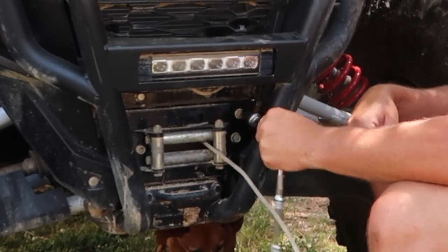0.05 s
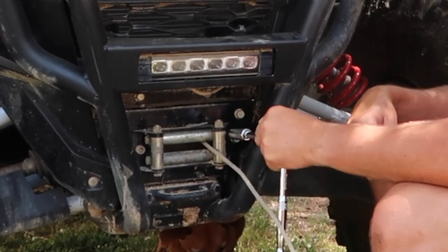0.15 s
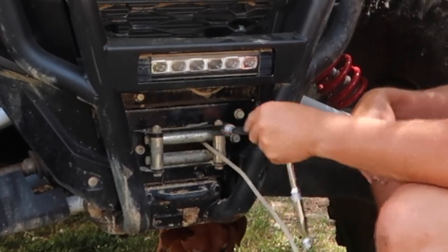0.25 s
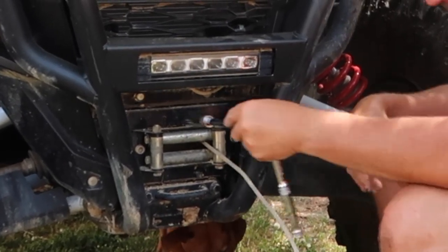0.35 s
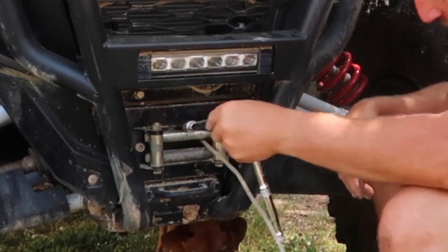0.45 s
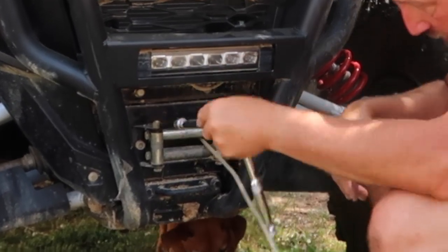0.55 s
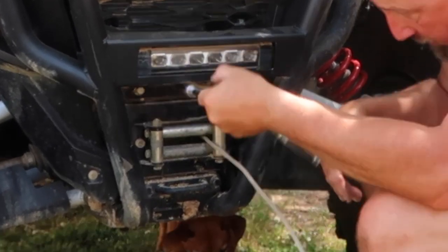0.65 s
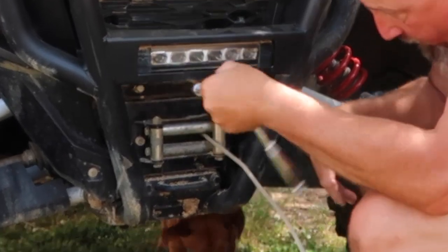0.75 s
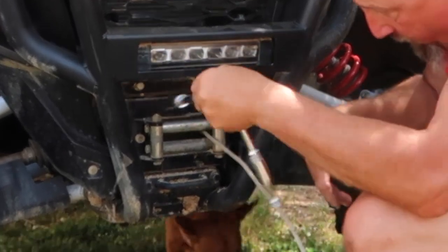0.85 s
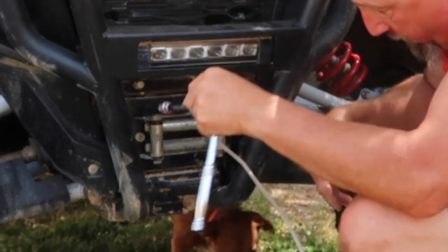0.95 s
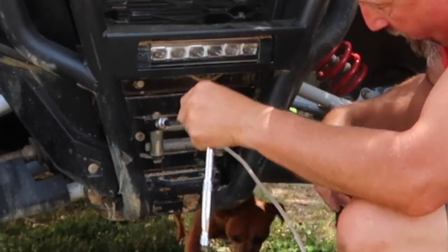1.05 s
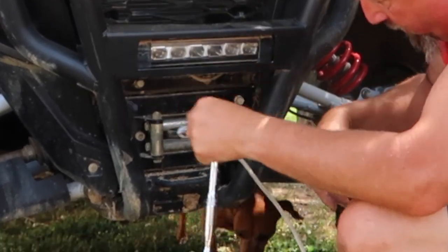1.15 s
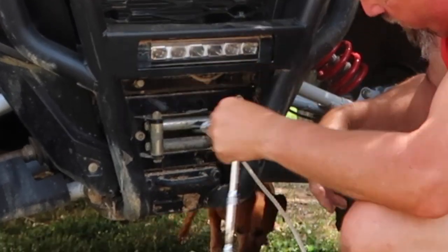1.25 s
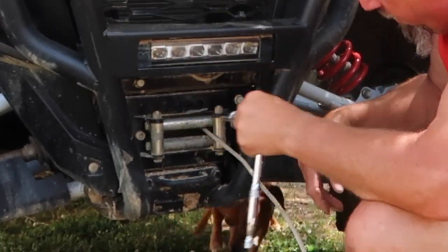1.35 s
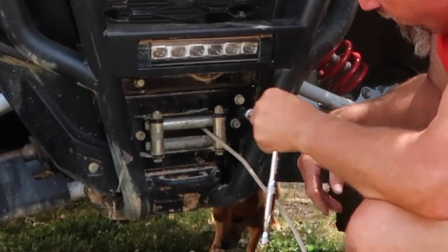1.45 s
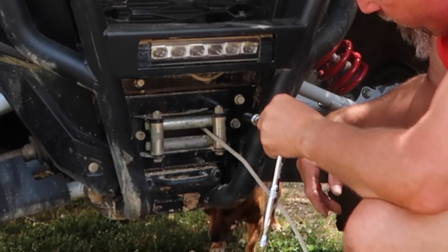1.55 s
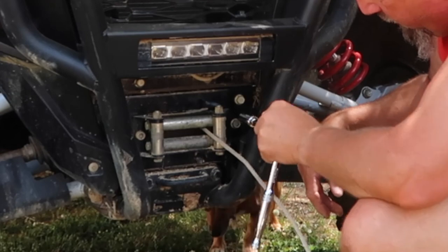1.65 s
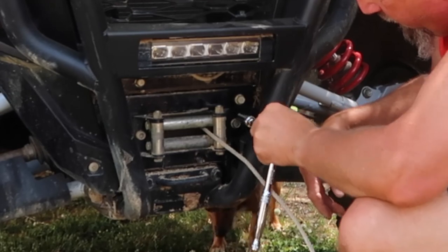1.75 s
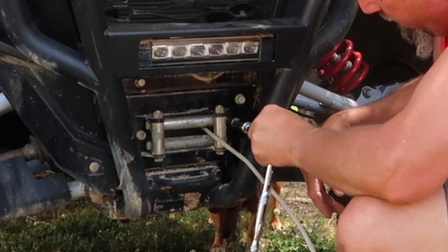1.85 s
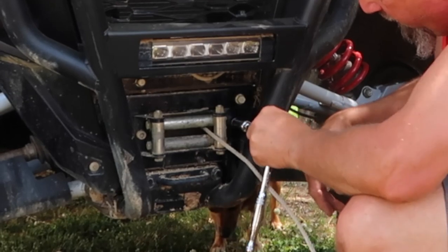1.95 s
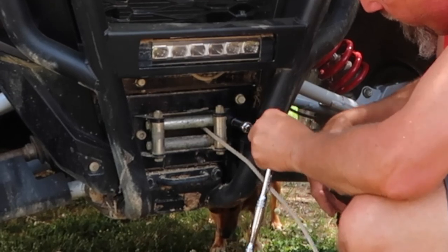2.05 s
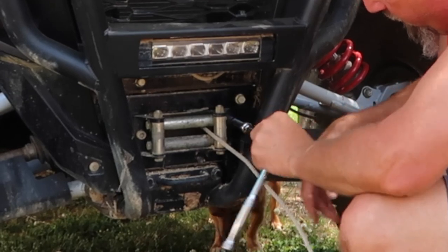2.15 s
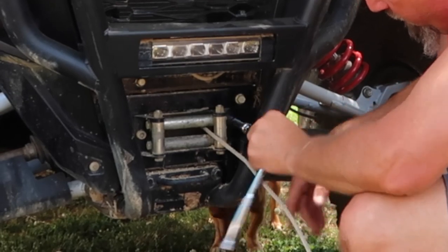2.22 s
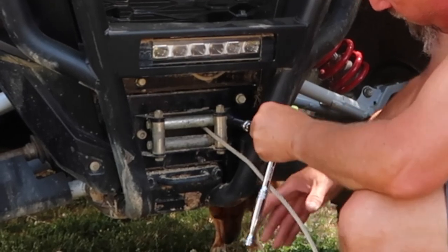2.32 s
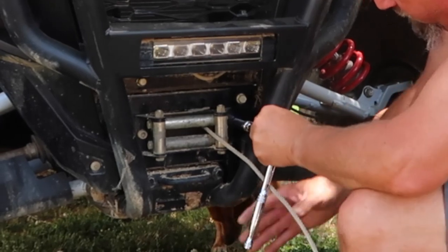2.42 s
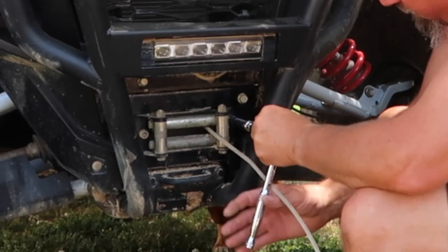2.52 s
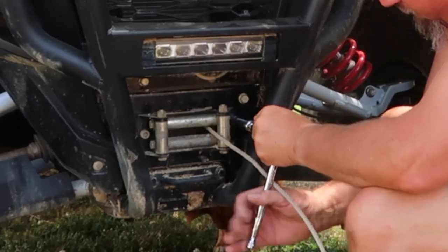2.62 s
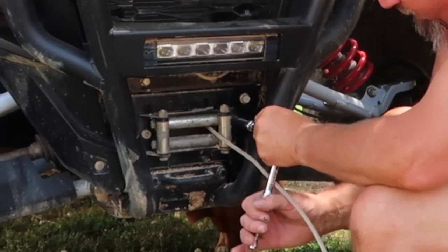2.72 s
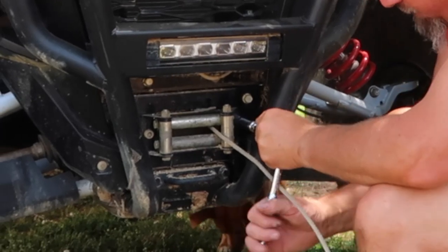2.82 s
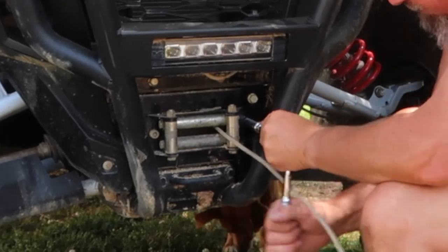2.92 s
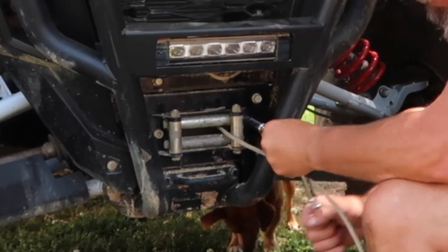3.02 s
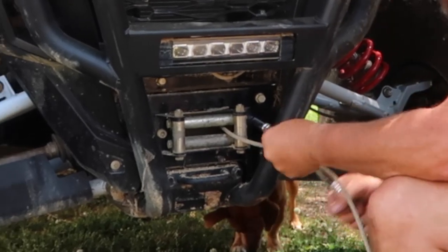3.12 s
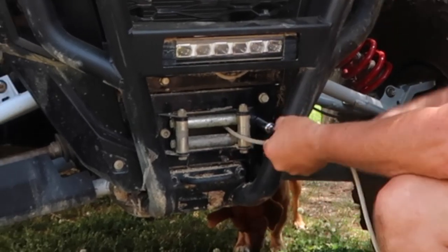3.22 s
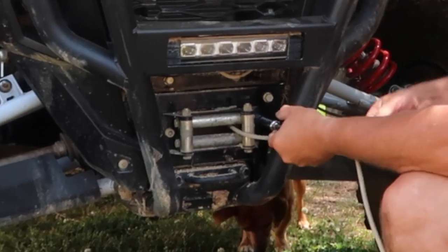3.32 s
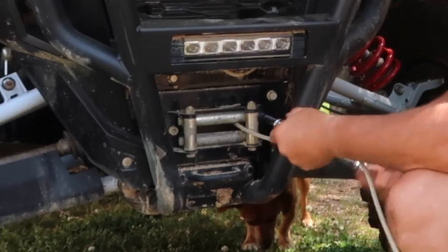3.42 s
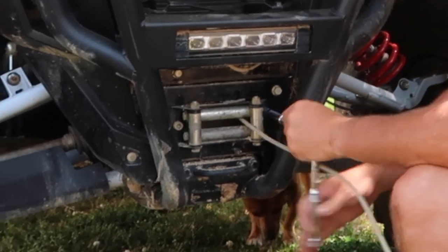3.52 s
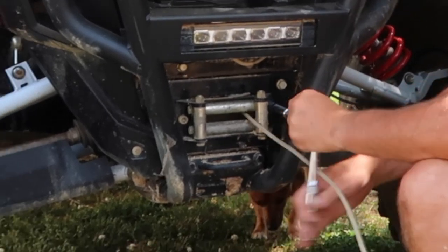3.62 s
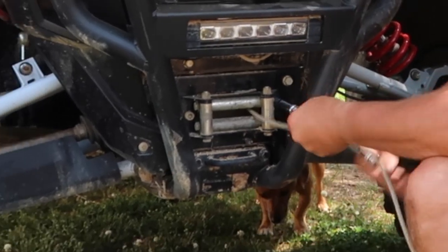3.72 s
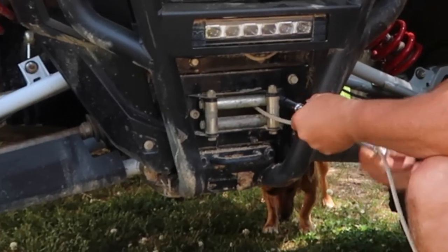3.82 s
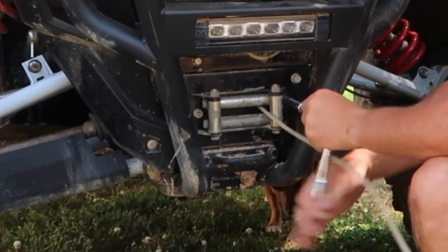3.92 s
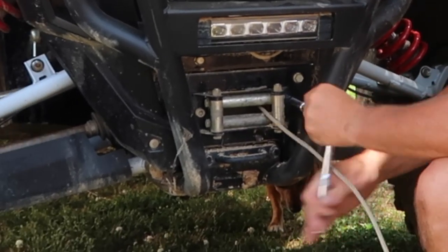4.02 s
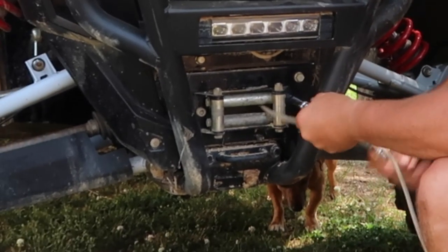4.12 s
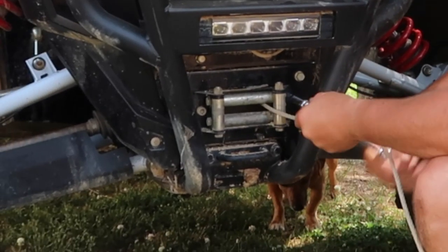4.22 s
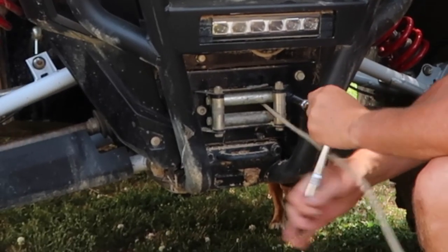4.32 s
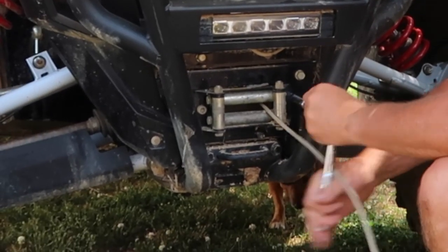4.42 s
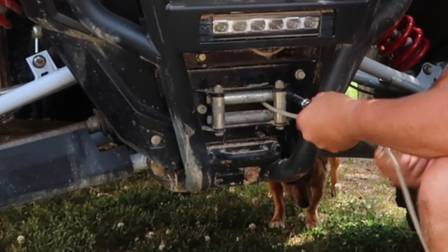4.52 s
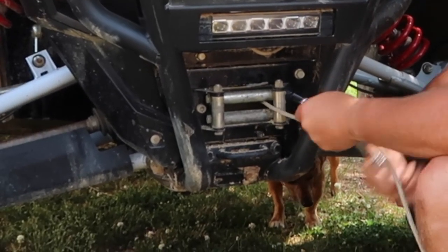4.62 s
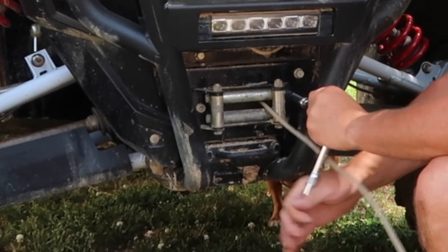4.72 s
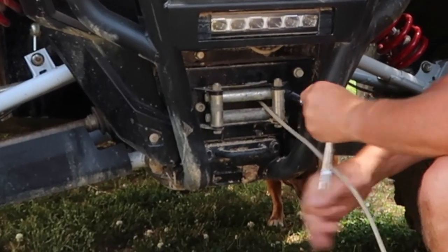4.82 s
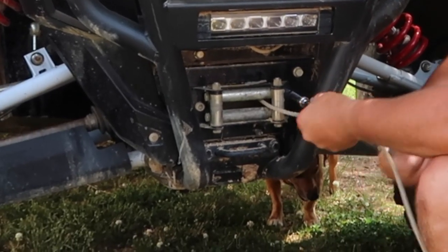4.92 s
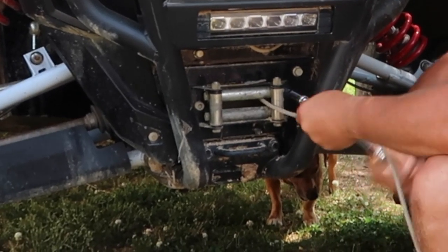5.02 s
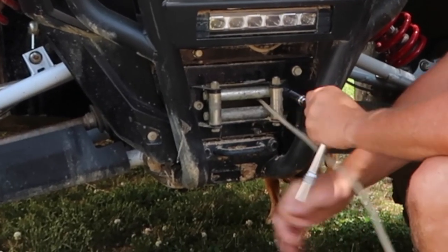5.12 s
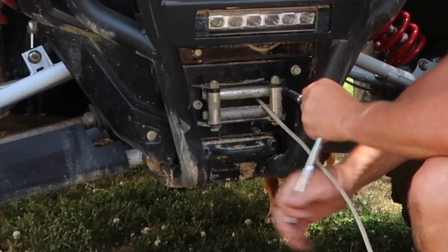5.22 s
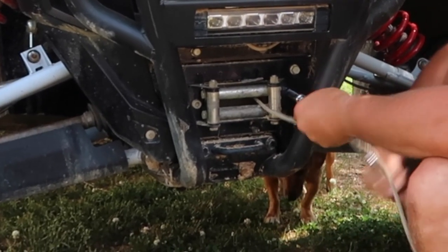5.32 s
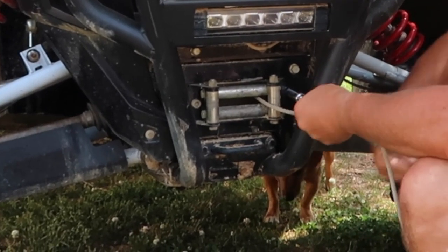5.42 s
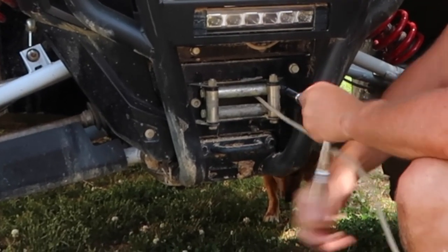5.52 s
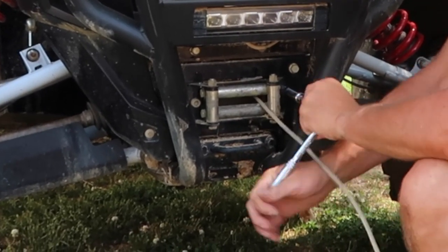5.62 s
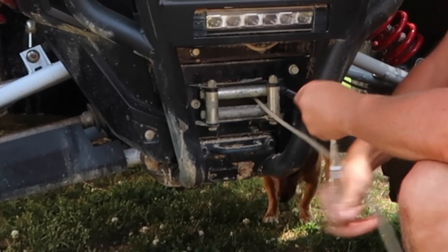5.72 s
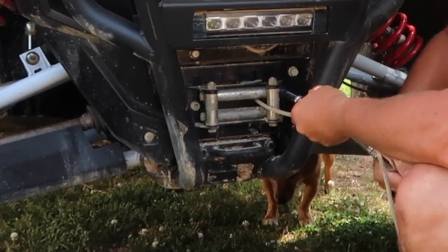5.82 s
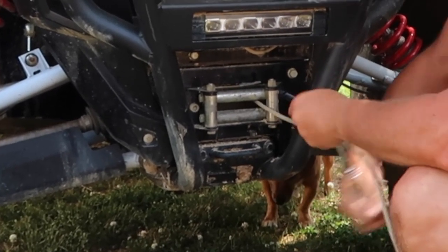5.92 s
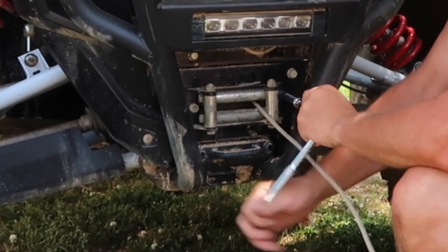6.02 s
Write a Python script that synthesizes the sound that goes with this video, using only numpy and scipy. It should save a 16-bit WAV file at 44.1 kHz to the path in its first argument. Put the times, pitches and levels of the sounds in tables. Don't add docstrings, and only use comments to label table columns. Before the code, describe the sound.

A close stereo microphone catches wrench work on a vehicle's steel bumper: light ticks, a single overloaded crack with a short metallic ring, then bright, irregular socket knocks. After a quieter moment, quick even zips of ratchet teeth recur about every half second, with small clunks between. A distant engine hums and wavers low under wide, soft outdoor air; a dog puffs faintly and a bird chirps twice.

```python
import sys
import numpy as np
from scipy import signal
from scipy.fft import rfft, irfft, next_fast_len
from scipy.io import wavfile
from scipy.ndimage import uniform_filter1d, map_coordinates

SR = 44100
rng = np.random.default_rng(int(sys.argv[2]) if len(sys.argv) > 2 else 0)


def elevation(decibels):
    levels = np.asarray(decibels, float)
    return 10 ** (levels / 20)


def transcribe(u):
    v = np.clip(np.atleast_2d(u).T, -1, 1)
    q = np.round(v * 32767).astype(np.int16)
    wavfile.write(sys.argv[1], SR, q)


N = 267246

# (frequency [Hz], side minus mid [dB])
NEAR_WIDTH = [(60, -37), (110, -38), (200, -21), (380, -20.5), (700, -33.5), (1290, -18), (2380, -27.5),
              (4400, -10.5), (8120, -1.5), (15000, -6.5)]
FAR_WIDTH = [(60, -31.5), (110, -34.5), (200, -21), (380, -10.5), (700, -10), (1290, -8), (2380, -5.5),
             (4400, 3.5), (8120, 3.5), (15000, 5)]

# (frequency [Hz], level [dB])
RUMBLE_SPECTRUM = [(12, -32), (20, -19.5), (49, 1), (97, -3.5), (134, 0.5), (243, -11), (287, -8),
                   (343, -16.5), (398, -15), (700, -25.5), (910, -59.5), (1540, -120)]
HISS_SPECTRUM = [(240, -29), (400, 3.5), (432, -6), (929, -4.5), (1080, -7), (1320, -7), (2190, -12),
                 (3810, -17.5), (5590, -24.5), (12200, -37), (15600, -48)]
RUMBLE_DB, HISS_DB, RISE_DB_PER_S = -39.5, -50, 0.16
# (time [s], level [dB])
ENGINE_LOAD = [(0.0, -42.5), (0.2, -43), (1.47, -50), (2.21, -39), (2.65, -56), (3.05, -39.5),
               (3.24, -53.5), (3.31, -40.5), (3.71, -46.5), (3.8, -38), (3.9, -47), (5.1, -40), (5.18, -56),
               (5.28, -36.5), (5.67, -42.5), (5.77, -32.5), (5.92, -57), (6.06, -42)]
# (level [dB], share of the load swing [0-1], own wander [dB])
ENGINE_ORDERS = [
    (-44, .05, 0),
    (-42.5, 1.1, 0.9),
    (-54, .2, 2),
]
ENGINE_HZ = 51.57
# (time [s], depth [dB])
DUCKS = [
    (0.779, -8.5),
    (2.4, -2),
]
DUCK_ATTACK_S, DUCK_RELEASE_S = 0.073, 0.36

# (time [s], length [s], level [dB])
PANTS = [(0.0, 0.055, -47.5), (0.2, 0.1, -50), (0.492, 0.072, -50), (1.39, 0.039, -58), (2.49, 0.041, -51),
         (2.727, 0.094, -54), (2.994, 0.1, -52.5), (4.218, 0.041, -60.5), (4.62, 0.06, -73),
         (5.017, 0.057, -57), (5.42, 0.03, -52)]
# (frequency [Hz], width [Hz], level [dB])
MUZZLE = [(884, 43, 13), (1297, 93, 15.5), (2380, 1600, -17)]
# (time [s], level [dB])
CHIRPS = [
    (1.02, -66),
    (2.675, -55),
]

# (time [s], peak level [dB])
SNAP = [
    (0.7677, -0.5),
    (0.7707, -7),
    (0.784, -16),
    (0.793, -21),
]
# (frequency [Hz], level [dB])
SNAP_COLOUR = [(120, -42.5), (200, -16), (321, -26.5), (526, -36), (1070, -7.5), (1460, -21), (1690, -11),
               (2760, 7.5), (3190, -7), (4950, 4.5), (6160, -12), (13200, -20.5), (15600, -38.5)]
WASH_COLOUR = [(200, -24.5), (383, -3.5), (570, -19), (1050, -3), (1850, -16.5), (2290, 1), (3290, -13.5),
               (5000, -19), (6770, -26), (9000, -28), (12000, -42), (15000, -52)]
# (frequency [Hz], t60 [s])
SNAP_DECAY = [(250, 0.037), (1000, 0.016), (2500, 0.038), (5000, .03), (12000, 0.031)]
WASH_DECAY = [(300, .35), (1000, 0.24), (2500, 0.22), (5000, 0.33), (8000, 0.25), (12000, .08)]
# (frequency [Hz], level [dB], t60 [s])
PLATE_MODES = [(310, -4, .3), (382, -8, .6), (802, -2, .13), (915, -10, .36), (1034, 0, .27),
               (1170, -4, .15), (1340, -15, .75), (1583, -6, .22), (1696, -12, .3), (2347, 1, .25),
               (2420, -6, .2), (3187, -7, .28), (3413, -6, .33), (3480, -8, .3), (4140, -12, .3),
               (4183, -11, .33), (4511, -13, .39), (5080, -10, .2), (5728, -9, .14), (6578, -17, .22)]

# (frequency [Hz], level [dB])
KNOCK_COLOUR = [(200, -3), (400, 11.5), (700, -13.5), (1000, -4.5), (2400, 6.5), (4500, 0.5), (8000, -10.5),
                (12000, -15.5), (15800, -25.5)]
# (frequency [Hz], t60 [s])
KNOCK_DECAY = [(300, 0.052), (1000, 0.14), (3000, 0.087), (6000, 0.092), (12000, 0.018)]
# (frequency [Hz], level [dB], t60 [s])
SOCKET_MODES = [(3031, 0, .28), (3073, -2, .22), (3129, 1, .11), (3190, 0, .05), (2961, -14, .2),
                (915, -17, .45), (1583, -7, .1), (4382, -17, .14)]
BOLT_MODES = [(915, -11, .2), (1034, -2, .13), (1085, 0, .09), (1250, -4, .09), (1340, -6, .08),
              (1583, -4, .08), (2300, -3, .05), (2557, -7, .08), (5400, -18, .05), (7000, -24, .07)]
FADING_MODES = [(960, -42, 0.51), (1690, -38, 0.099), (3110, -43.5, 0.13)]
# (time [s], peak level [dB], low body [dB], brightness [dB], socket ring [dB])
LOOSE = [(0.0539, -33, -2, -9.5, -5), (0.0876, -40, -8, -9, -11), (0.4983, -43, 5, -2, -30),
         (1.6746, -10.5, -16.5, -31.5, -3.5), (1.6855, -21.5, 0.5, -19, -1), (1.7992, -39.5, 10, -30, -1.5),
         (1.9862, -17.5, -5, -21, -4.5), (2.0004, -20.5, -9, -14.5, -26), (2.23, -35, 5, -16, -20),
         (2.2404, -11, -8.5, -14, -4), (2.2516, -15, -2.5, -18, -5)]
# (time [s], peak level [dB], low body [dB], brightness [dB], lead of the first tick [s])
PULLS = [(2.3306, -25.5, -9.5, -19, 0.0012), (2.3746, -14.5, -2, -28.5, 0.0037),
         (3.367, -32.5, 2.5, -31, .003), (3.7739, -17.5, 1, -27, 0.0006), (4.1403, -22, -2, -26, 0.00036),
         (4.156, -31.5, -2, -31, 0.0049), (4.528, -20.5, -4, -22, .005), (4.897, -28.5, -7, -16, .003),
         (4.9428, -30, 1, -13.5, 0), (5.3632, -23, -1.5, -19, 0), (5.753, -30.5, -2, -43, 0.014),
         (5.8021, -25, 1.5, -21, 0.0018)]
# (time [s], peak level [dB], low body [dB])
TAKE_UP = [(3.484, -37, -7), (3.951, -28.5, 0.5), (4.336, -26, -9), (4.7161, -28.5, -9), (5.1292, -28, -7),
           (5.556, -29, -11), (6.0142, -20, -12)]
# (time [s], peak level [dB])
TAPS = [(0.2407, -38.5), (2.1824, -40), (3.7262, -38), (4.2443, -31), (4.64, -36), (5.0376, -35.5)]
LOOSE_DECAY, PULL_DECAY = 1.21, 1.8

# (first tooth [s], length to last tooth [s], teeth [count], peak level [dB],
# share of the way at the peak [0-1])
STROKES = [
    (3.5203, .1572, 18, -22, 0.48),
    (3.975, .0915, 15, -19, 0.6),
    (4.358, .099, 16, -17.5, 0.64),
    (4.7467, .109, 15, -17.5, .15),
    (5.1566, .126, 18, -18.5, .42),
    (5.5826, .1295, 18, -16.5, .2),
    (6.0408, .11, 17, -18.5, 0.17),
]
# (resonance left free [Hz], its gain [dB], sound passed to the plate [dB])
GRIPS = [(2910, 6, -4), (2340, 3.5, 2.5), (2441, 1, 1), (2300, 1, 1), (2426, 1, 0.5), (3930, 2, -1),
         (3884, 6, -1)]
# (frequency [Hz], width [Hz], level [dB])
HEAD_MODES = [(1061, 31.6, -1.5), (1237, 13.6, -7.5), (1630, 55, 2.5), (2298, 56, 4.5), (2447, 110, 5.5),
              (3077, 66, 2), (3350, 60, 0.5), (3707, 44, 1), (4035, 61, 0.5), (5560, 100, -7),
              (6030, 116, -3.5), (6900, 190, -13), (11300, 400, -14)]
# (frequency [Hz], level [dB])
TOOTH_COLOUR = [(400, -20.5), (800, -32.5), (1050, -5), (1500, -9.5), (2450, -2), (3000, -10.5), (3800, -2),
                (5400, -8), (7200, -8), (8800, -23), (11300, -13.5), (13500, -23.5), (15700, -36)]
# (frequency [Hz], t60 [s])
TOOTH_DECAY = [(800, 0.17), (2500, 0.08), (5000, 0.037), (12000, 0.021)]
START_DRAG, END_DRAG = .35, 1.1
END_TEETH = 1.6
GAP_JITTER, SIZE_SCATTER_DB, FIRST_TOOTH_DB = .04, 1.05, -1.5
BEFORE_PEAK_DB, AFTER_PEAK_DB = 4, 10
GRIP_OCTAVES = 0.16
HEAD_DRIFT_DB = 3.5
CRACK_DB, SING_DB = -14.5, -15.5


def unit(x):
    return x / np.sqrt(np.mean(x ** 2) + 1e-20)


def along(points, hz):
    f, v = np.transpose(points)
    return np.interp(np.log(hz + 1), np.log(f + 1), v)


def wobble(rate):
    knots = rng.standard_normal(int(N * rate / SR) + 4)
    return map_coordinates(knots, [np.arange(N) * rate / SR])


def filtered(x, response):
    m = next_fast_len(N + SR // 2)
    return irfft(rfft(x, m) * response(np.fft.rfftfreq(m, 1 / SR)), m)[..., :N]


def stereo(pair, width):
    side = filtered(pair[1], lambda hz: elevation(along(width, hz)))
    return np.array([pair[0] + side, pair[0] - side])


def add(track, s, sound):
    part = track[:, round(s * SR):][:, :sound.shape[1]]
    part += sound[:, :part.shape[1]]


def clang(colour_db, decay, size, scale=1, lumps_db=0, tail_db=-60, stretch=1, order=7, contact=0.00019):
    hz, t, z = signal.stft(rng.standard_normal((2, size)), SR, nperseg=2 ** order)
    fall_db = -60 * t / (scale * along(decay, hz)[:, None])
    lumps = lumps_db * unit(uniform_filter1d(rng.standard_normal(len(hz)), size=2))
    strength = elevation((colour_db(hz) + lumps)[:, None])
    fade = elevation(fall_db) + elevation(tail_db + fall_db / stretch)
    x = signal.istft(z * strength * fade, SR, nperseg=2 ** order)[1][:, :size]
    x = x * (1 - np.exp(-(np.arange(size) / SR / contact) ** 2))
    return x / np.sqrt(np.mean(x[:, :130] ** 2))


def ring(modes, scatter_db, size, scale=1, detune=0, turns=1, rise=0.0023):
    hz, db, t60 = np.transpose(modes)[:, :, None]
    t = np.arange(size) / SR
    scatter = scatter_db * rng.standard_normal((2, len(modes), 1))
    level = elevation(db + scatter - 60 * t / (scale * t60))
    hz = hz * (1 + detune * rng.standard_normal(hz.shape))
    phase = 2 * np.pi * turns * rng.random((2, len(modes), 1))
    return np.sum(level * np.sin(2 * np.pi * hz * t + phase), axis=1) * (1 - np.exp(-t / rise))


def ducking():
    gain_db = np.zeros(N)
    for s, db in DUCKS:
        since = np.maximum(np.arange(N) / SR - s, 0)
        attack = 1 - np.exp(-since / DUCK_ATTACK_S)
        gain_db += db * attack * np.exp(-(since / (2 * DUCK_RELEASE_S)) ** 2)
    return gain_db


def rush(spectrum, patchy_db):
    z = signal.stft(rng.standard_normal((2, N)), nperseg=512)[2]
    field = uniform_filter1d(rng.standard_normal(z.shape[1:]), size=6, axis=0)
    field = uniform_filter1d(field, size=14, axis=1)
    pair = signal.istft(z * elevation(patchy_db * unit(field)), nperseg=512)[1][:, :N]
    return unit(filtered(pair, lambda hz: elevation(along(spectrum, hz))))


def outdoors():
    seconds = np.arange(N) / SR
    gain_db = ducking() + RISE_DB_PER_S * seconds
    rumble = elevation(RUMBLE_DB) * rush(RUMBLE_SPECTRUM, patchy_db=0.5)
    hiss = elevation(HISS_DB) * rush(HISS_SPECTRUM, patchy_db=0.1)
    air = elevation(gain_db) * (rumble + hiss)
    turn = 2 * np.pi * np.cumsum(ENGINE_HZ * (1 + 0.0118 * wobble(2.1))) / SR
    load_db = np.interp(seconds, *np.transpose(ENGINE_LOAD))
    swing_db = load_db - load_db.mean()
    for order, (db, share, wander_db) in enumerate(ENGINE_ORDERS, 1):
        level_db = db + share * swing_db + (1 - min(share, 1)) * gain_db
        level_db = level_db + wander_db * wobble(6) + 1.3 * wobble(17)
        air[0] += elevation(level_db) * np.sin(order * turn + 0.53 * wobble(12))
    return air


def bird():
    out, t = np.zeros((2, N)), np.arange(2000) / SR
    pitch_hz = 3800 + 1300 * np.exp(-(t / 0.015) ** 2)
    note = np.sin(2 * np.pi * np.cumsum(pitch_hz) / SR) * np.hanning(len(t)) ** 0.26
    for s, db in CHIRPS:
        add(out, s, elevation(db) * np.array([note, note]))
    return out


def dog():
    puffs = np.zeros((1, N))
    for s, length, db in PANTS:
        add(puffs, s, elevation(db) * np.hanning(round(length * SR * 1.1))[None] ** 0.21)

    def mouth(f):
        resonances = sum(elevation(db) * 1j * f * w / (c * c - f * f + 1j * f * w) for c, w, db in MUZZLE)
        return resonances / (1 + (f / 4000) ** 4)

    return puffs * unit(filtered(rng.standard_normal((2, N)), mouth))


def snap():
    out, blow_s = np.zeros((2, N)), SNAP[0][0]
    blow_colour = lambda hz: along(SNAP_COLOUR, hz)
    wash_colour = lambda hz: along(WASH_COLOUR, hz)
    for s, db in SNAP:
        add(out, s, elevation(db - 0.5) * clang(blow_colour, SNAP_DECAY, size=6000, order=8))
    add(out, blow_s, elevation(-17.5) * clang(wash_colour, WASH_DECAY, size=24000, order=9))
    add(out, blow_s, elevation(-23) * ring(PLATE_MODES, 0, size=30000))
    add(out, .759, elevation(-37.5) * clang(blow_colour, WASH_DECAY, size=600))
    return out


def knock(db, low_db, bright_db, scale):
    tilt = [(500, .5 * low_db + 3.5), (800, low_db + 18.5), (1100, low_db + 16.5),
            (1800, 0.0059), (4000, 0.0071), (6000, bright_db + 13)]
    colour = lambda hz: along(KNOCK_COLOUR, hz) + along(tilt, hz)
    blow = clang(colour, KNOCK_DECAY, size=9000, scale=scale, lumps_db=4.5, tail_db=-24.5,
                 stretch=6.7, order=8, contact=.0005)
    body = ring(BOLT_MODES, 3.15, size=9000, scale=scale, detune=.015)
    return elevation(db - 11.5) * blow + elevation(db + low_db - 14.5) * body


def knocks():
    out = np.zeros((2, N))
    contacts = np.array([row[0] for row in LOOSE + PULLS if row[1] > -33])
    add(out, 0, ring(FADING_MODES, 0, size=9000))
    for s, db, low_db, bright_db, ring_db in LOOSE:
        until_next = contacts[contacts > s + .04][0] - s
        damped = elevation(-60 * np.maximum(np.arange(12000) / SR - until_next, 0) / .06)
        sing = ring(SOCKET_MODES, 0.73, size=12000, scale=LOOSE_DECAY, detune=0.0053)
        add(out, s, knock(db, low_db, bright_db, LOOSE_DECAY))
        add(out, s, elevation(db + 4.53 * ring_db + 1.5) * damped * sing)
    for s, db, low_db, bright_db, lead in PULLS:
        add(out, s, knock(db - 6, low_db=7, bright_db=-7, scale=0.79))
        add(out, s + lead, knock(db, low_db, bright_db, PULL_DECAY))
    for s, db, low_db in TAKE_UP:
        add(out, s, knock(db, low_db, bright_db=-20.5, scale=1.6))
    for s, db in TAPS:
        add(out, s, knock(db, low_db=3.5, bright_db=-22.5, scale=1))
    return out


def teeth(start, length, count, peak_db, peak_at):
    chance, k = rng.standard_normal((40, 2)), np.arange(round(count) - 1)
    drag = START_DRAG * np.exp(-k) + END_DRAG * np.exp((k - k[-1]) / END_TEETH)
    gaps = 1 + drag + GAP_JITTER * chance[k, 0]
    at = np.append(0, np.cumsum(gaps) / gaps.sum())
    db = peak_db - np.where(at < peak_at, BEFORE_PEAK_DB, AFTER_PEAK_DB) * (at - peak_at) ** 2
    db = db + SIZE_SCATTER_DB * chance[:len(at), 1] + FIRST_TOOTH_DB * (at == 0)
    return [(s, d) for s, d in zip(start + at * length, db) if s < N / SR]


def pawl_drop(db, grip, plate_db, swing_db):
    head = []
    for (hz, width, level), swing in zip(HEAD_MODES, swing_db):
        head.append((hz, level + grip(hz) + swing, np.log(1000) / (np.pi * width)))
    dull = [(4000, 0), (9000, .5 * (db + 21))]
    colour = lambda hz: along(TOOTH_COLOUR, hz) + grip(hz) + along(dull, hz)
    crack = clang(colour, TOOTH_DECAY, size=3500, lumps_db=4.5, scale=0.46,
                  tail_db=-7.5 + .6 * plate_db, stretch=12, contact=0.00065)
    sing = ring(head, 1.7, size=2200, scale=0.99, detune=.004, turns=0.27, rise=0.00024)
    return crack, sing


def ratchet():
    out = np.zeros((2, N))
    for stroke, (free_hz, free_db, plate_db) in zip(STROKES, GRIPS):
        def grip(hz):
            free = free_db * np.exp(-(np.log2((hz + 1) / free_hz) / GRIP_OCTAVES) ** 2)
            return free + plate_db / (1 + (hz / 1900) ** 8)

        drift = 2 * np.pi * rng.random(len(HEAD_MODES))
        for s, db in teeth(*stroke):
            swing_db = HEAD_DRIFT_DB * np.sin(drift + np.pi * (s - stroke[0]) / stroke[1])
            crack, sing = pawl_drop(db, grip, plate_db, swing_db)
            add(out, s - .0005, elevation(db + CRACK_DB) * crack)
            add(out, s - .0005, elevation(db + SING_DB) * sing)
    return out


def scene():
    far = outdoors() + bird() + dog()
    near = snap() + knocks() + ratchet()
    return stereo(far, FAR_WIDTH) + stereo(near, NEAR_WIDTH)


def roll_off(x):
    return signal.sosfilt(signal.butter(12, 15700, fs=SR, output="sos"), x)


def record(dry):
    clipped = dry / (1 + np.abs(dry) ** 12) ** (1 / 12)
    limited = filtered(clipped, lambda hz: hz < 15740)
    return roll_off(limited)


dry = scene()
out = record(dry)
transcribe(out)
```